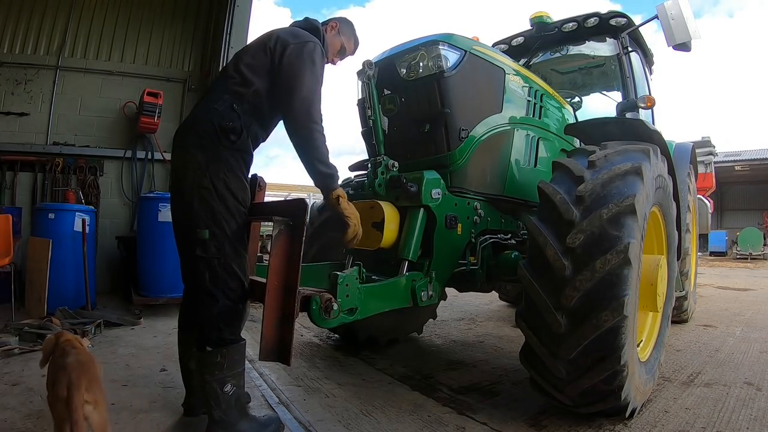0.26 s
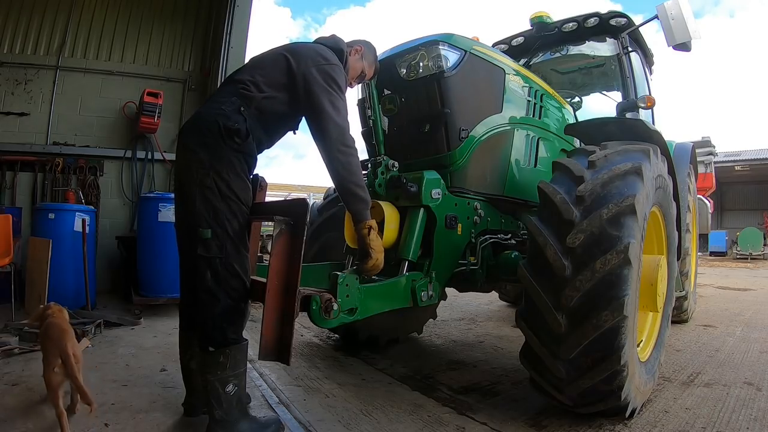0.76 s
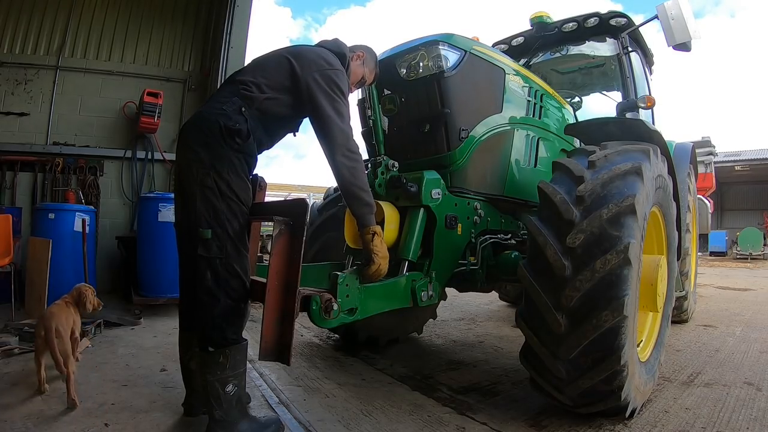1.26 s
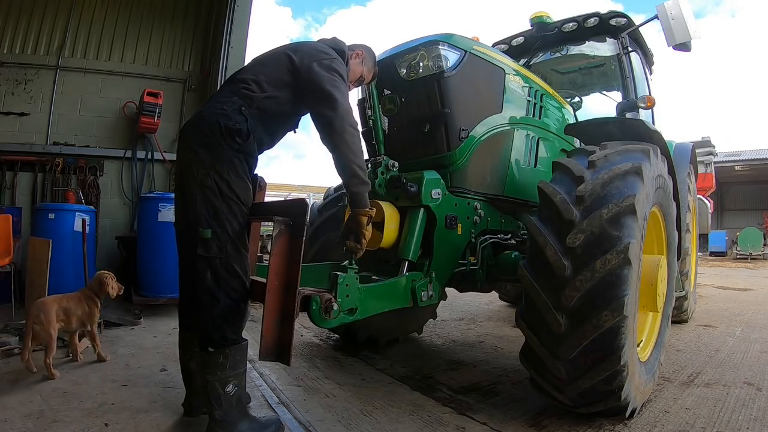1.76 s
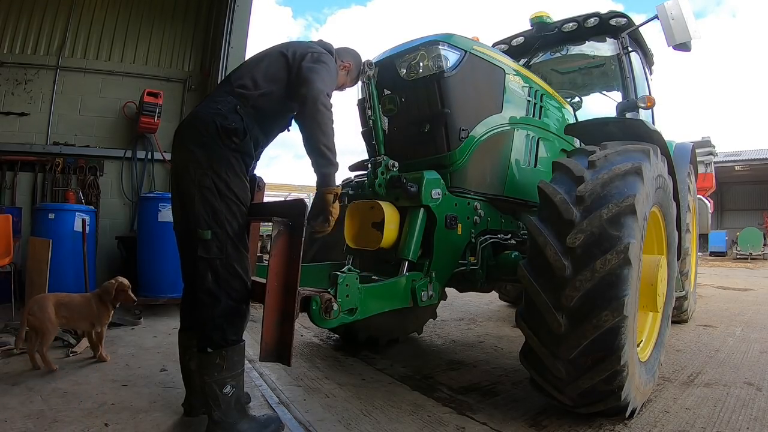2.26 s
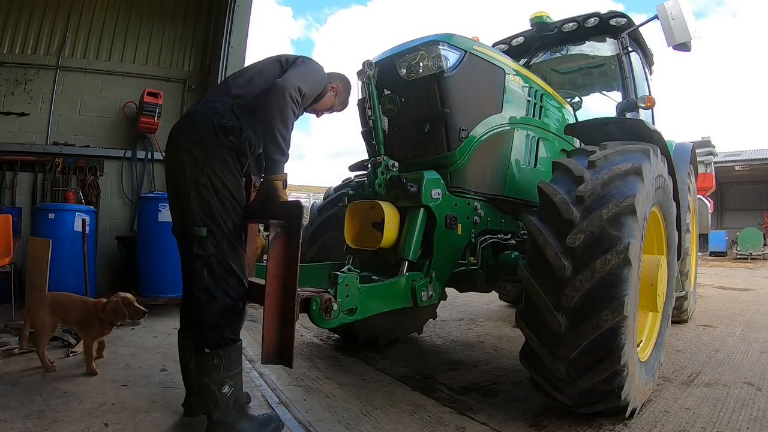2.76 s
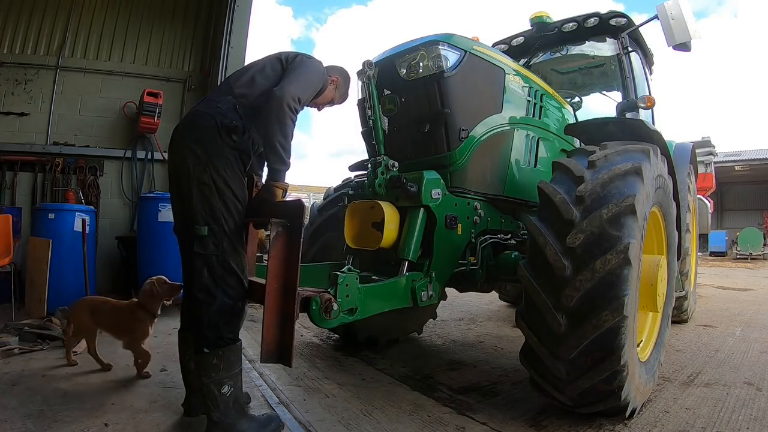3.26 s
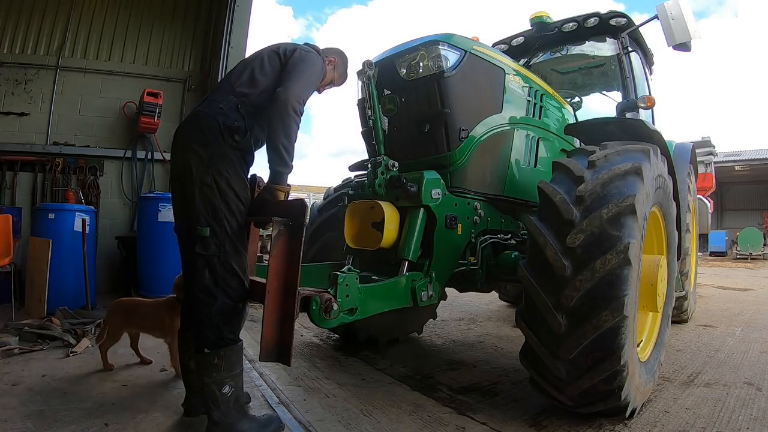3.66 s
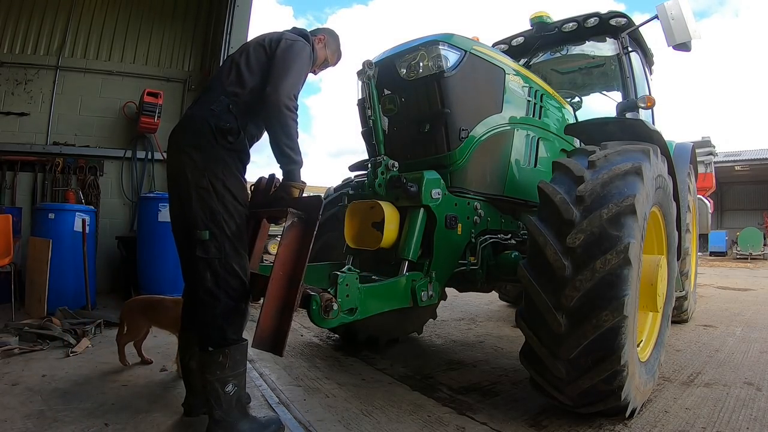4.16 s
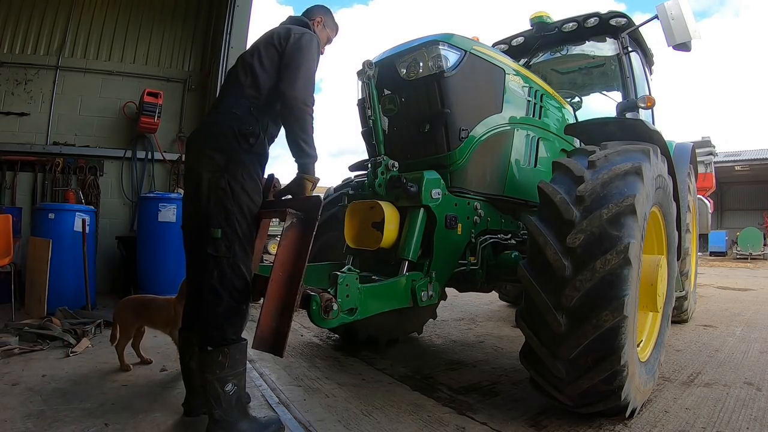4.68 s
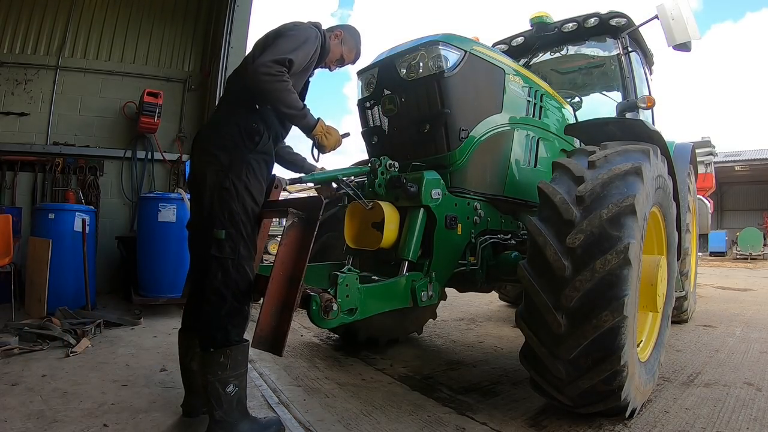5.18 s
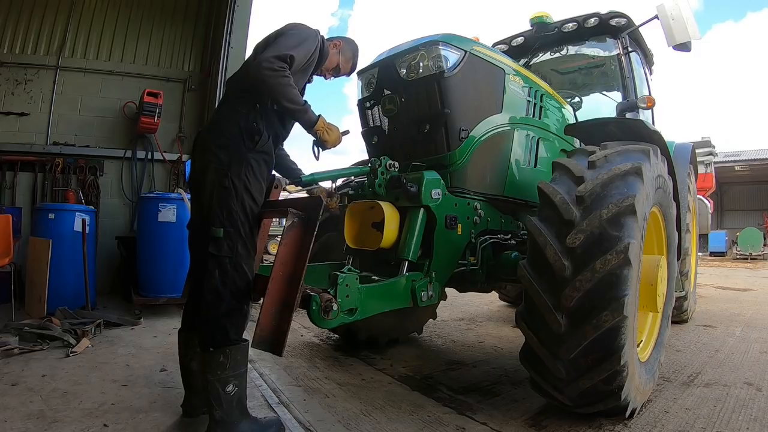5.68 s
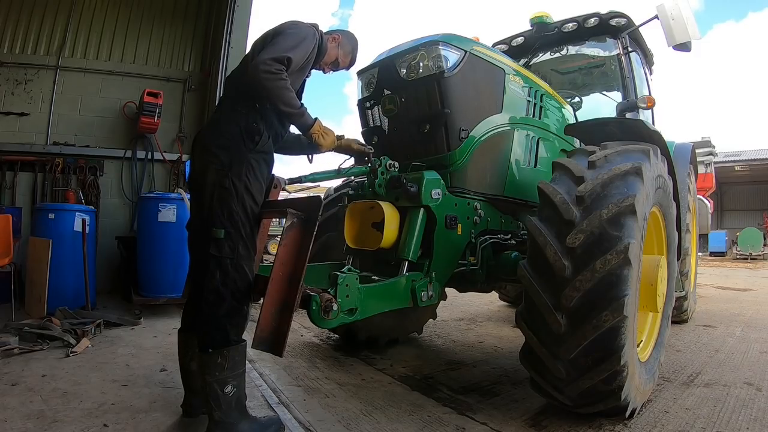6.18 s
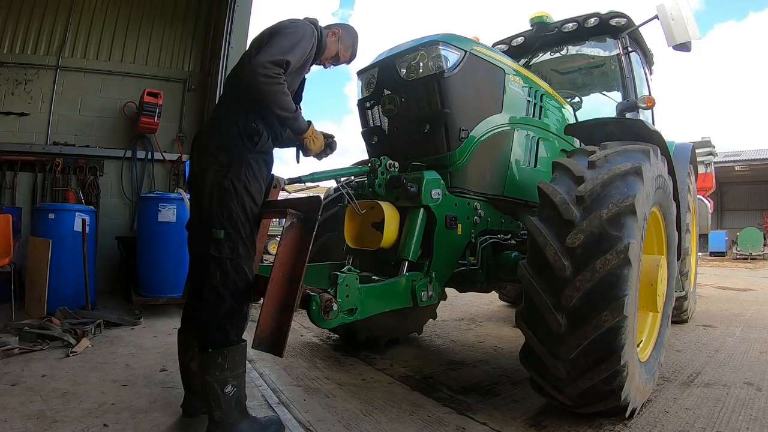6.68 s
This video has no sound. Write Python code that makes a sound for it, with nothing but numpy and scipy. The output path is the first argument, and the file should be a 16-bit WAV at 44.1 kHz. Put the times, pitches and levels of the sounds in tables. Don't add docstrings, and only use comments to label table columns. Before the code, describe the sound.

Close, nearly mono sound with sheet-metal echo: a low idling engine and soft hiss, small ticks of handled steel, a sharp burst of clanking, a pause, then another scraping clang that rings on. Distant bird notes come and go. Then a sudden change to a quicker, boomy engine, under a loud rising cow call, a higher far cow, a calf and hoarse cattle breaths.

```python
import sys
import numpy as np
from scipy import signal
from scipy.fft import rfft, irfft
from scipy.io import wavfile
from scipy.ndimage import uniform_filter1d

SR = 44100
rng = np.random.default_rng(int(sys.argv[2]) if len(sys.argv) > 2 else 0)


def file_out(sig):
    cols = np.atleast_2d(sig).T
    lim = np.clip(cols, -1, 1)
    pcm = np.round(lim * 32767).astype(np.int16)
    wavfile.write(sys.argv[1], SR, pcm)


def gain_from_db(level_db):
    decades = np.asarray(level_db, float) / 20
    return 10 ** decades


N = 305613
T = np.arange(N) / SR
JUMP_S = 4.83


def unit(x):
    return x / np.sqrt(np.mean(x ** 2))


def curves(table):
    s, *columns = np.transpose(table)
    gate = np.clip(np.minimum(T - s[0], s[-1] + 0.034 - T) / 0.012, 0, 1)
    return [gate] + [np.interp(T, s, column) for column in columns]


def walk(rate):
    hold = int(SR / rate)
    steps = np.repeat(rng.standard_normal(N // hold + 1), hold)
    return 1.197 * uniform_filter1d(uniform_filter1d(steps, hold), hold)[:N]


def tone(phase, db):
    return np.sqrt(2) * gain_from_db(db) * np.sin(phase + rng.uniform(0, 2 * np.pi))


def turns(hz):
    return 2 * np.pi * np.cumsum(hz) / SR


def band(x, lo_hz, hi_hz):
    return signal.sosfilt(signal.butter(2, [lo_hz, hi_hz], "bandpass", fs=SR, output="sos"), x)


def noise(spectrum, ref_hz, flicker_db):
    f = np.arange(N // 2 + 1) * SR / N + 1e-3
    hz, db = np.transpose(spectrum)
    full = rfft(rng.standard_normal(N)) * gain_from_db(np.interp(np.log(f), np.log(hz), db))
    inside = (f > ref_hz[0]) & (f < ref_hz[1])
    scale = np.sqrt(np.mean(irfft(full * inside, N) ** 2))
    out = 0
    for k in range(11):
        octave = np.clip(1 - abs(np.log2(f / 16) - k), 0, 1)
        out = out + irfft(full * octave, N) * gain_from_db(flicker_db * walk(15))
    return out / scale


def beat(null_s, period_s, depth):
    return np.sqrt(1 - depth * np.cos(np.pi * (T - null_s) / period_s) ** 2)


# start_s, firing_hz, level_db
IDLE = [(0, 37.5, -41.5), (.5, 37.88, -40.5), (1.7, 38.19, -40.5), (2.3, 38.19, -41), (2.85, 37.52, -43.5),
        (3.45, 37.95, -47.5), (3.9, 38.32, -47), (4.35, 37.46, -48.5), (4.8, 37.7, -43),
        (6.93, 38.13, -43.5)]
# multiple, level_db
IDLE_OVERTONES = [(3, -65), (4, -59.5), (5, -65), (6, -66), (7, -72)]
# pitch_hz, level_db (per Hz)
YARD = [(4, -12), (12, 15.5), (24, -10), (50, -12.5), (90, -10), (212, -18.5), (490, -22), (850, -24.5),
        (2600, -31.5), (3640, -34.5), (8000, -39), (15500, -43)]
HISS_DB, HISS_FOLLOW = -62.5, 0.47


def idling():
    _, hz, db = curves(IDLE)
    phase = turns(hz * (1 + 0.0045 * walk(6)))
    out = tone(phase, db + 0.85 * walk(7.4))
    out += tone(2 * phase, -53 + 1.2 * walk(9.9)) * beat(null_s=0.75, period_s=1.094, depth=0.83)
    out += sum(tone(k * phase, overtone_db + 2 * walk(6)) for k, overtone_db in IDLE_OVERTONES)
    throb = (1 + 0.16 * np.cos(phase)) * gain_from_db(1.6 * walk(25.24))
    hiss = noise(YARD, (3000, 12000), 0.48) * gain_from_db(HISS_DB + HISS_FOLLOW * (db + 40.5))
    return out + hiss * throb


# start_s, firing_hz, load_db
FAST = [(4.83, 51.24, -2.5), (5.0, 50.5, 0), (5.22, 50.3, -2), (5.5, 52.7, 0.5), (5.7, 52.34, -1),
        (5.87, 52.83, 1.5), (6.1, 53.5, -1), (6.2, 53.92, 1.5), (6.6, 54.7, -1), (6.93, 54.36, -1)]
# pitch_hz, level_db
BOOM = [(50, -30.5), (53.3, -35), (55, -43), (104, -37.5), (109, -47), (152, -39), (159.5, -39), (162, -35)]
# pitch_hz, level_db (per Hz)
ROAR = [(4, 1), (12, 6), (30, -18), (108, -5.5), (226, -6), (460, -13), (730, -13.5), (1730, -18.5),
        (3000, -28), (5000, -35.5), (9000, -42.5), (11000, -55), (15500, -65)]
ROAR_DB, ROAR_FADE_S, ROAR_FADE_DB_PER_S = -42.5, 5.85, -4


def fast_diesel():
    _, hz, load_db = curves(FAST)
    phase = turns(hz * (1 + 0.0023 * walk(8)))
    boom_hz, boom_db = np.transpose(BOOM)
    one, two, three = (
        tone(k * phase, load_db + np.interp(k * hz, boom_hz, boom_db) + 1.35 * walk(22)) for k in (1, 2, 3))
    out = one + two * beat(null_s=5.14, period_s=0.4, depth=0.89) + three * gain_from_db(2.1 * walk(14))
    out += sum(tone(k * phase, -44 - 2.64 * k + 4 * walk(3.08)) for k in range(4, 9))
    whistle = tone(turns(8350 + 60 * walk(150)), -77 + 4 * walk(28))
    roar_db = ROAR_DB + load_db + ROAR_FADE_DB_PER_S * np.maximum(T - ROAR_FADE_S, 0)
    roar = noise(ROAR, (200, 450), 1.1) * gain_from_db(roar_db) * (1 + 0.1 * np.cos(phase))
    return (T > JUMP_S) * (out + whistle + roar)


RING_S = [1.7025, 1.825, 1.879, 1.9205, 2.0375, 3.318, 3.436, 3.4555, 3.7185, 1.282, 6.912, 1.79, 1.9205,
          3.318, 3.4555, 3.7185, 1.8, 1.946]
LOOSE = [.12, 1, .5, 1, .8, 1, .4, 1.3, .5, 1, 1, 1, 1, 1, 1, 1, .1, .3]
# (level_db, contact_ms), then modes of pitch_hz, level_db, t60_s
FRAME_RINGS = [
    ((-29.5, 4.34), [(6780, 3, 0.16), (7290, 5.5, 0.06), (8900, -22, 0.15), (8330, -12, .07), (11130, -16, 0.0396), (9911, -19, 0.25), (12790, -10, 0.097), (13570, -35.5, 0.2)] + [(775, -4.0, 0.1), (1336, -0.5, 0.035), (1620, 0.5, 0.029), (3020, -4, 0.045), (2000, 0, 0.056), (2880, -10.5, 0.11)]),
    ((-35, 1.9), [(4750, 3.5, 0.0395), (6780, -18, 0.09)]),
    ((-41, 6), [(5030, -7, 0.057), (2800, 4, 0.034), (8070, -10, 0.3)]),
    ((-28.5, 6.5), [(6000, -6.0, 0.31), (5700, -9.5, .12), (6180, 9.0, 0.03), (6380, -9.5, 0.14), (6750, -13, 0.27), (8200, 2, 0.12), (9410, -8, 0.24), (9750, -7, 0.24), (10230, -17.0, 0.245), (12940, -25.5, 0.1)] + [(7600, 5.0, 0.046), (11860, -7, 0.22), (14900, -11, 0.129)]),
               ((-39.5, 2.8), [(5860, -17, 0.99), (6170, -5, 0.57), (6000, -14, 0.66), (7320, -11.5, 0.97), (5100, -12, .05), (9100, -6, 0.49), (11240, -8, 0.28), (11340, 5.5, 0.2), (11450, 6, 0.081), (11700, 4, 0.2), (12940, -4, 0.23), (1260, 0.5, 0.035), (3080, -24, .15)]),
    ((-30.5, 9.6), [(4040, -18, 0.16), (6060, -9, 0.22), (6700, -4.0, 0.33), (7000, -1, 0.071), (10100, -27, 0.49)] + [(2300, 5.6, 0.054), (2874, 5.5, 0.037)]),
    ((-44, 8.1), [(9930, 3, 0.6), (9900, -3, .06), (14900, -16, .12)]),
    ((-25.5, 8.4), [(2870, -4.5, 0.14), (3850, -8.0, 0.088), (4160, -16, 0.25), (4953, -16.5, 0.84), (6600, 4, 0.064), (6770, -6.5, 0.68), (6480, -13, 1.0), (8400, -7.5, 0.17), (9600, -16, 0.11), (11500, -18, 0.12), (11800, -14, .1), (13100, -15, 0.2), (14900, -18, 0.16)] + [(4750, -14, 0.44), (4890, 4, 0.041), (2360, 0.5, 0.082)]),
               ((-38.5, 5.4), [(5060, -4.5, 0.44), (6400, -11.5, 0.58), (6400, -0.5, 0.049), (9290, 0, 0.4), (11640, -5, 0.3), (11850, -9, 0.4), (11440, -6, 0.36), (12270, -3, 0.34), (13090, -12, 0.38), (14970, -14, 0.18)] + [(1970, 0, 0.027)]),
    ((-54, 3.1), [(6640, 8.5, 0.048), (11800, -1, 0.092), (15450, -8, .08)]),
    ((-44.5, 14), [(1490, 2, 0.086), (1130, 5, 0.094), (1268, 4, 0.068), (6800, -3, .06)]),
]
BODY_RINGS = [
    ((-37.5, 3.7), [(840, -0.24, .08), (1040, -2, 0.1), (1940, 0, .05), (2270, -2, .06)]),
    ((-31, 2.27), [(617, -20, .1), (797, -2.5, .1), (1160, 1.5, 0.049), (1740, -10, 0.0606), (2750, 2, .06), (3100, -6, .07)]),
    ((-31, 6.6), [(710, -6, 0.093), (985, -10, .07), (1220, -3, 0.045), (1976, -4, .06), (3400, -5, .07), (4030, -9, 0.14), (5140, -6, 0.091), (7370, -11, .1)]),
    ((-30.5, 13), [(602, -11.5, 0.19), (789, -7, 0.18), (946, -11, 0.24), (1170, -2, .1), (1340, -8, .1), (1680, -4.5, 0.084), (1953, -2.5, 0.18), (3260, -2, 0.091), (6050, 1, .1), (7550, -12, 0.14)]),
    ((-41, 2.5), [(1026, -5, 0.082), (2500, 3.5, 0.03), (3430, -5, .06), (7540, -10.5, 0.48)]),
]
PIN_RINGS = [
    ((-42, 3.4), [(6860, 1.5, .06), (7300, -16, .05)]),
    ((-38, 3.95), [(5770, 0.5, .08), (6870, 4, .15), (8430, -4, 0.104), (9700, -6, .15), (12940, -8, 0.099)]),
]
THIN_HZ, THIN_SHARE = 8000, .32


def steel():
    out, t = np.zeros(N + SR), T[:SR]
    rings = FRAME_RINGS + BODY_RINGS + PIN_RINGS
    for s, loose, ((db, contact_ms), modes) in zip(RING_S, LOOSE, rings):
        chatter = 0.028 * np.exp(-t / 0.094)
        push = np.minimum(t * 3000 / contact_ms, 1) * (np.exp(-t * 1000 / contact_ms) + chatter)
        push = push * rng.standard_normal(SR)
        ring = 0
        for hz, mode_db, t60 in modes:
            play = loose * (THIN_SHARE if hz > THIN_HZ else 1)
            wobble = np.tanh(uniform_filter1d(rng.standard_normal(SR), size=180) * 13)
            flutter = gain_from_db(5 * np.sqrt(play) * wobble * np.minimum(t / .03, 1))
            offsets = np.array([0, .014, -.018]) * play * rng.uniform(0.37, 1.4, 3)
            decay = np.log(1000) / (np.clip(t60, .03, .8) * SR)
            for off, share in zip(offsets, (1, .7, .55)):
                pole = np.exp(2j * np.pi * hz * (1 + off) / SR - decay)
                z = signal.lfilter([1], [1, -pole], push)
                ring = ring + share * gain_from_db(mode_db) * flutter * z.imag / abs(z).max()
        i = int(s * SR)
        out[i:i + SR] += gain_from_db(db) * ring
    return out[:N]


HUM_DB, HUM_T60_S = -22, 0.43


def knocks(table, rise_ms, soft_t60_s, shrink):
    out, t = np.zeros(N + SR), T[:SR // 2]
    for s, db, thud_db, fizz_db in table:
        t60 = soft_t60_s * (1 - shrink * (db + 28.0))
        chance = rng.standard_normal((6, len(t)))
        grain = gain_from_db(3.0 * uniform_filter1d(chance[3], size=30) * np.sqrt(30))
        fall_db = -60 * t / t60
        shape = np.minimum(t * 1000 / rise_ms, 1) * grain
        thud_rise_db = 6.5 * np.minimum(t / 0.021, 1) - 1
        thud = gain_from_db(thud_db + thud_rise_db + fall_db) * unit(band(chance[0], 654, 1280))
        clack = gain_from_db(fall_db) * unit(band(chance[1], 1350, 3450))
        fizz = gain_from_db(fizz_db + 2.0 * fall_db) * unit(band(chance[2], 5500, 10700))
        body = chance[4, :400] * np.exp(-t[:400] / 0.0023) + 11 * (t[:400] == 0)
        body = body / np.linalg.norm(body)
        rattle = signal.fftconvolve(shape * (thud + clack + fizz), body)[:len(t)]
        shiver = np.minimum(t / .015, 1) * gain_from_db(HUM_DB - 60 * t / HUM_T60_S) * unit(band(chance[5], 330, 3900))
        i = int(s * SR)
        out[i:i + len(t)] += gain_from_db(db - 8) * shiver + gain_from_db(db - 13.0) * rattle
    return out[:N]


# start_s, level_db (peak), thud_db, fizz_db
BLOWS = [
    (1.7025, -14.5, -19, -15),
    (1.8248, -18, -1, -22),
    (1.8791, -14, -9, -31),
    (1.9126, -9.5, -11, -3),
    (1.9204, -5, -11, -2.5),
    (2.0373, -31.5, -10, 14.5),
    (3.4555, -14.5, -19, -25),
    (3.7199, -35, -1, 2),
]
SCRAPES = [(1.704, -8.5, -10.5, -21), (1.7394, -42, -17, -11), (1.7874, -24.5, -5, -15),
           (1.9444, -30, -4, -13), (3.3004, -29, 4.5, -35), (3.3124, -23, -7, -7), (3.3174, -9, -9, -3),
           (3.3494, -39, -20, 7), (3.4114, -23, 3.5, -17), (3.4994, -42, -20, 2), (3.5244, -48, -8.5, 15),
           (6.9107, -30, 2, -26.5)]
DRAGS = [
    (3.4244, -19.5, -11, -21),
    (3.4354, -21.5, -15, -3),
]
TAPS = [(0.2894, -45, -14, 2), (0.7844, -55, 15.5, -11), (0.9744, -42, -2.5, 5.5), (0.9862, -36, 6, -5),
        (1.0665, -33.5, 1.5, -5), (1.282, -34, -2, -4), (1.3744, -56, 3.5, 5), (1.3927, -41, 10.5, 2),
        (2.4089, -58, -15, -16), (2.5694, -39.5, -1, -1.5), (3.03, -42, 5, -8), (3.1484, -43.5, 3, -6.5),
        (3.8, -47.5, 11, -20), (4.2794, -46, -7.5, -3), (4.7456, -44.5, 14.5, -20),
        (6.1394, -34.5, 13.5, -40), (6.3779, -35, 5, -30)]


def contacts():
    out = knocks(BLOWS, rise_ms=0.83, soft_t60_s=0.14, shrink=0.019)
    out += knocks(SCRAPES, rise_ms=6.8, soft_t60_s=0.24, shrink=0.034)
    out += knocks(DRAGS, rise_ms=7.8, soft_t60_s=0.53, shrink=.005)
    return out + knocks(TAPS, rise_ms=1.9, soft_t60_s=0.074, shrink=0.0045)


def swishes(table):
    out, t = np.zeros(N + SR), T[:SR // 2]
    for s, length, centre_hz, width_hz, db in table:
        hiss = unit(band(rng.standard_normal(len(t)), centre_hz - width_hz / 2, centre_hz + width_hz / 2))
        i = int(s * SR)
        out[i:i + len(t)] += gain_from_db(db) * hiss * np.sin(np.pi * np.clip(t / length, 0, 1) ** .6)
    return out[:N]


# start_s, length_s, centre_hz, width_hz, level_db
BRUSHES = [(1.8, .012, 11000, 9000, -52), (1.904, 0.013, 11000, 9000, -46), (1.961, 0.012, 6000, 6000, -40),
           (3.303, 0.011, 6850, 500, -54), (3.32, 0.035, 10500, 10000, -42), (3.92, .015, 11000, 9000, -62),
           (4.958, .01, 6000, 4000, -54), (6.143, .02, 5700, 2600, -51), (6.361, 0.058, 5800, 3000, -56.5),
           (6.499, .012, 9500, 11070, -54), (6.516, 0.0053, 11030, 8000, -60),
           (6.655, .012, 11310, 8000, -63), (6.908, 0.032, 6460, 1600, -49)]


def brushes():
    return swishes(BRUSHES)


# pitch_hz, level_db
THROAT = [(150, -8.5), (350, -14), (700, -7), (1150, -8.5), (1300, -17), (1480, -9), (1620, -17),
          (1780, -6.5), (1980, -18.5), (2320, -15), (2520, -22), (2700, -20.5), (3100, -29.5), (4500, -48)]
TAUT_HZ = 166
CLOSING_S, CLOSING_RISE_S, CLOSING_HZ, CLOSING_DB = 6.06, 0.023, 530, 2.5
CLOSING_DULL_DB = -2


def cow(table, pen, jitter, patchy_db, breath_db, chest_db, dull_db, flutter_db):
    gate, hz, effort = curves(table)
    hoarse = np.clip((TAUT_HZ - hz) / 20, .04, 1)
    phase = turns(hz * (1 + jitter * hoarse * walk(140)))
    throat_hz, throat_db = np.transpose(THROAT)
    swell = -.5 * ((T - CLOSING_S) / CLOSING_RISE_S) ** 2
    closed = np.clip((T - CLOSING_S) / 0.081, 0, 1) * (T < table[-1][0] + .05)
    on, out = gate > 0, 0
    for k in range(1, 27):
        lift = np.zeros(N)
        lift[on] = sum(db * np.exp(-.5 * ((k * hz[on] - at_hz) / width) ** 2) for at_hz, width, db in pen)
        lift += CLOSING_DB * np.exp(swell - ((k * hz - CLOSING_HZ) / 90) ** 2)
        lift += CLOSING_DULL_DB * (k > 6) * closed
        patchy = patchy_db * walk(16) * np.exp(-abs(lift) / 6)
        db = effort + np.interp(k * hz, throat_hz, throat_db) + lift + patchy - 4 * hoarse
        db = db + chest_db * (k < 3) + dull_db * np.log2(k / 4)
        out = out + tone(k * phase, db + flutter_db * walk(45))
    breath = unit(band(rng.standard_normal(N), 370, 1700)) * (1 + .5 * np.cos(phase))
    return gate * (out + breath * gain_from_db(effort + breath_db + 4.5 * hoarse))


def lowing(table, slope_db):
    gate, hz, db = curves(table)
    phase = turns(hz * (1 + 0.0035 * walk(30)))
    return gate * sum(tone(k * phase, db + slope_db * (k - 1) + 3 * walk(15)) for k in range(1, 5))


# start_s, pitch_hz, level_db (effort)
NEAR_COW = [(4.94, 131, -44.5), (5.13, 154, -41), (5.3, 163.6, -39), (5.53, 170.9, -37.5),
            (5.69, 176.7, -36), (5.85, 178.9, -41), (6.01, 177.2, -36.5), (6.085, 175.6, -35.5),
            (6.13, 166.4, -38.5)]
NEXT_COW = [(6.22, 147, -50.5), (6.35, 158, -45), (6.55, 166, -52.5), (6.7, 171.4, -51.5),
            (6.85, 171.6, -44.5), (6.93, 173.6, -52)]
LAST_COW = [(4.83, 159.4, -38.5), (4.88, 157.6, -42), (4.98, 156.2, -52)]
# pitch_hz, width_hz, level_db
NEAR_PEN = [(504.7, 4.3, 14.5), (521.9, 8.5, 19.5), (544, 3.6, -4), (838, 15.6, 11), (890, 9.7, 5),
            (1005, 12, 7), (1042.6, 8.5, 11.5), (1063, 4.9, 2), (1067, 2.6, 5), (624, 12, 11),
            (1116, 13, 7), (1376, 33, 7.5), (1489, 11, 9), (1606, 11, -10), (1680, 17, 9), (1775, 19, 2),
            (1880, 13, -1), (2000, 14, 14.5), (2155, 7.4, 8.5), (2413, 33, 7.5), (2340, 16, 8),
            (2677, 11, 9), (3620, 40, 12)]
NEXT_PEN = [(462, 22, 11.3), (500, 8.1, 21.6), (816.6, 11, 13.4), (846, 12.5, 7.2), (878, 11, 8.1),
            (906, 28, 12)]
# start_s, pitch_hz, level_db
FAR_COW = [(5.3, 247.5, -51), (5.55, 272.4, -44), (5.8, 292.2, -43), (6.05, 292.4, -45), (6.2, 270, -42.5),
           (6.32, 237.5, -73)]
CALF = [(6.25, 504.4, -60), (6.4, 537.5, -45), (6.52, 543.5, -47), (6.66, 528.7, -62)]
GRUNT = [(4.83, 249.7, -40), (4.9, 251.8, -38.5), (4.96, 259.5, -39), (5.05, 281, -44), (5.2, 317.4, -46),
         (5.35, 332.5, -40.5)]


def herd():
    out = cow(NEAR_COW, NEAR_PEN, jitter=0.0261, patchy_db=3.6, breath_db=-10.5,
              chest_db=.1, dull_db=0.19, flutter_db=1.2)
    out += cow(NEXT_COW, NEXT_PEN, jitter=0.0081, patchy_db=4.2, breath_db=-17.0,
               chest_db=5.0, dull_db=-3.0, flutter_db=4.8)
    out += cow(LAST_COW, NEXT_PEN, jitter=0.0115, patchy_db=3.3, breath_db=-12,
               chest_db=.1, dull_db=.1, flutter_db=2.5)
    return out + lowing(FAR_COW, -18) + lowing(CALF, -8.0) + lowing(GRUNT, -18)


# start_s, length_s, centre_hz, width_hz, level_db
HOARSE_BANDS = [
    (6.15, 0.53, 855, 60, -46),
    (6.3, 0.44, 720, 50, -49),
    (6.35, 0.26, 1256, 60, -53),
    (6.7, 0.29, 343.5, 30.09, -44.5),
]


def hoarse_bands():
    return swishes(HOARSE_BANDS)


# start_s, length_s, from_hz, to_hz, level_db
SONG = [(0.186, 0.14, 2000, 2060, -62), (0.406, 0.034, 2600, 2670, -61.5), (0.458, 0.034, 2760, 2560, -59),
        (0.59, 0.078, 2610, 2750, -69), (0.59, 0.18, 2100, 2060, -69), (1.347, 0.023, 3010, 3040, -62),
        (1.391, 0.021, 2400, 2340, -58), (3.76, .1, 2120, 2105, -59), (3.908, 0.08, 1880, 2095, -58.5),
        (3.975, 0.074, 2106, 2090, -59.5), (4.077, 0.13, 2500, 2470, -60.5),
        (4.114, 0.057, 2635, 2640, -57.5), (4.17, 0.21, 2630, 2620, -68), (4.07, 0.084, 2100, 2090, -69),
        (1.435, 0.028, 2270, 2200, -64), (4.414, .03, 2720, 2750, -70), (4.464, 0.09, 3060, 2980, -67),
        (4.51, 0.092, 2620, 2700, -67)]


def blackbird():
    out = 0
    for s, length, from_hz, to_hz, db in SONG:
        u = np.clip((T - s) / length, 0, 1)
        glide_hz = from_hz + (to_hz - from_hz) * u ** 0.74 + 40 * walk(120)
        out = out + np.sin(np.pi * u) ** 0.22 * tone(turns(glide_hz), db)
    return out * gain_from_db(4.5 * np.tanh(walk(45)))


# pitch_hz, level_db
DRONE = [(222, -65.5), (558, -71)]
DRONE_FROM_S = 2.2


def drone():
    swell = np.clip((T - DRONE_FROM_S) / .6, 0, 1) * (T < JUMP_S)
    return swell * sum(tone(turns(hz + 12 * walk(50)), db + 4 * walk(30)) for hz, db in DRONE)


SHED_T60_S, SHED_DARK_HZ = 1, 3360


def shed(x):
    t = T[:SR]
    late = rng.standard_normal((2, SR)) * np.clip((t - .008) / 0.0049, 0, 1)
    low = band(late[0], 150, SHED_DARK_HZ) * gain_from_db(-60 * t / SHED_T60_S)
    high = .5 * band(late[1], SHED_DARK_HZ, 14000) * gain_from_db(-60 * t / (.62 * SHED_T60_S))
    return signal.fftconvolve(x, unit(low + high) / np.sqrt(SR))[:N]


def scene():
    metal = band(contacts() + steel(), 400, 17000)
    cattle = herd()
    bird = blackbird()
    echo = shed(gain_from_db(-18.5) * metal + gain_from_db(-14) * cattle + gain_from_db(-12.5) * bird)
    mono = idling() + fast_diesel() + metal + cattle + bird + echo
    mono = mono + brushes() + hoarse_bands() + drone()
    return np.array([mono, mono])


def low_pass(x):
    return signal.sosfilt(signal.butter(12, 16810, fs=SR, output="sos"), x)


def record(dry):
    # lo_hz, hi_hz, level_db of the trace
    bands = [(40, 1200, -39), (1200, 3000, -36), (3000, 6000, -30), (6000, 10000, -30), (10000, 15000, -19)]
    trace = sum(gain_from_db(db) * band(dry[0], lo_hz, hi_hz) * walk(700) for lo_hz, hi_hz, db in bands)
    wide = dry + np.array([trace, -trace])
    top_hz = 15900
    wide = signal.sosfilt(signal.ellip(10, .2, 80, top_hz, fs=SR, output="sos"), wide)
    return low_pass(wide)


dry = scene()
out = record(dry)
file_out(out)
```